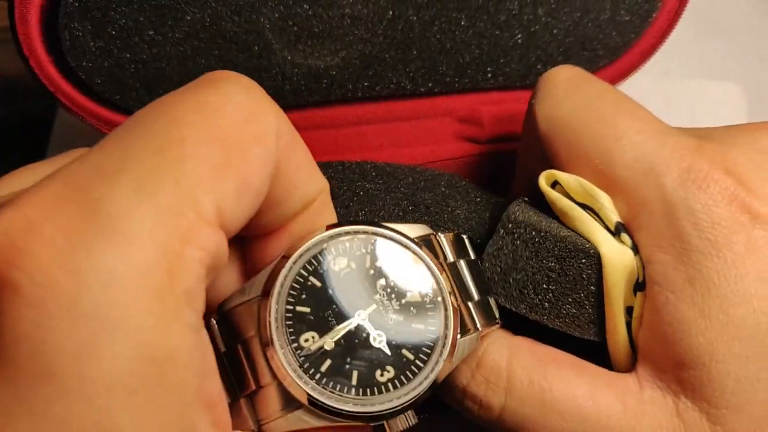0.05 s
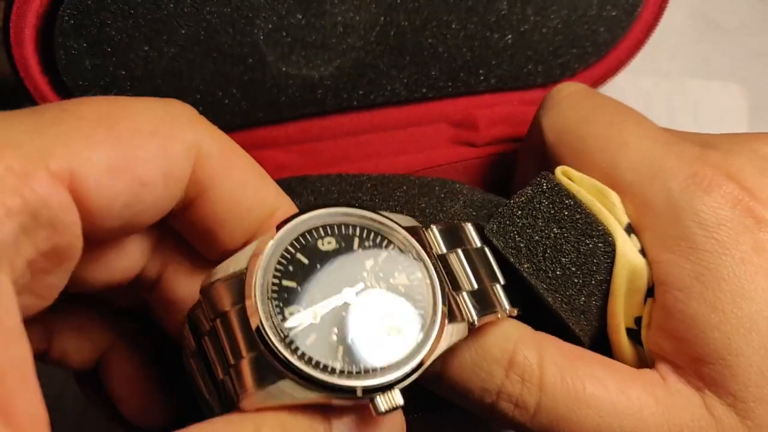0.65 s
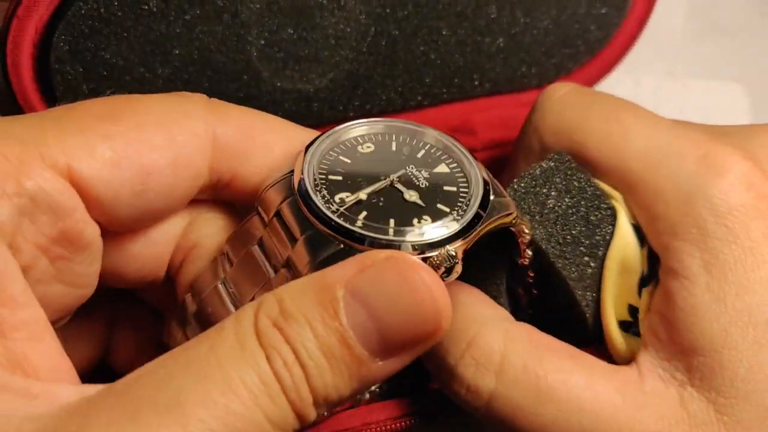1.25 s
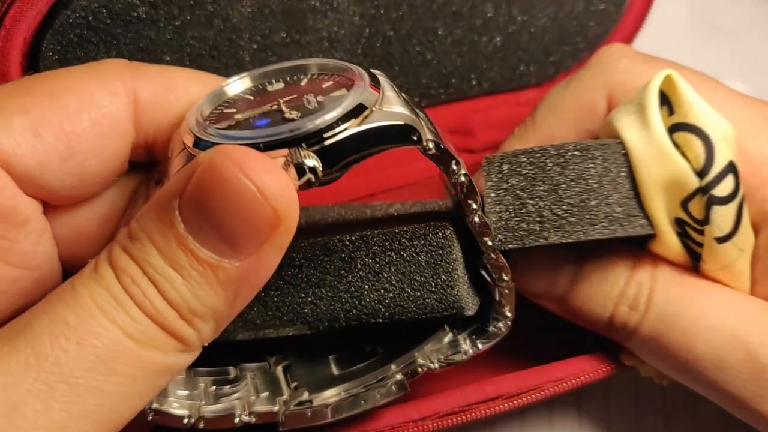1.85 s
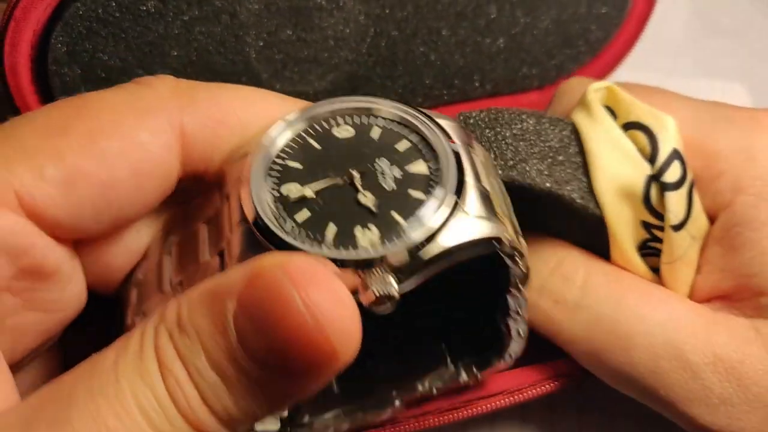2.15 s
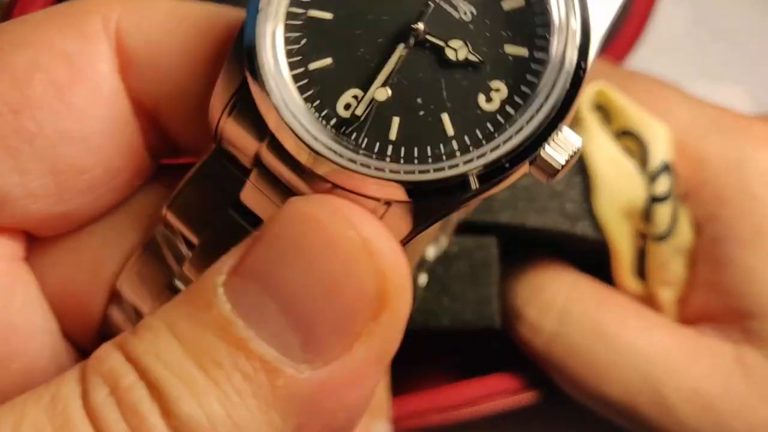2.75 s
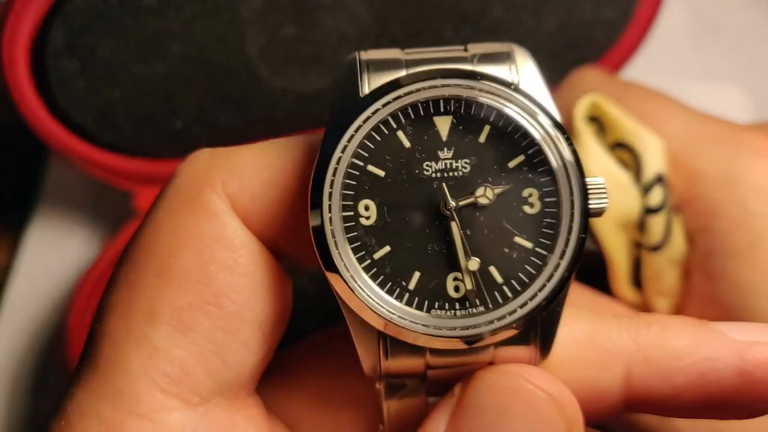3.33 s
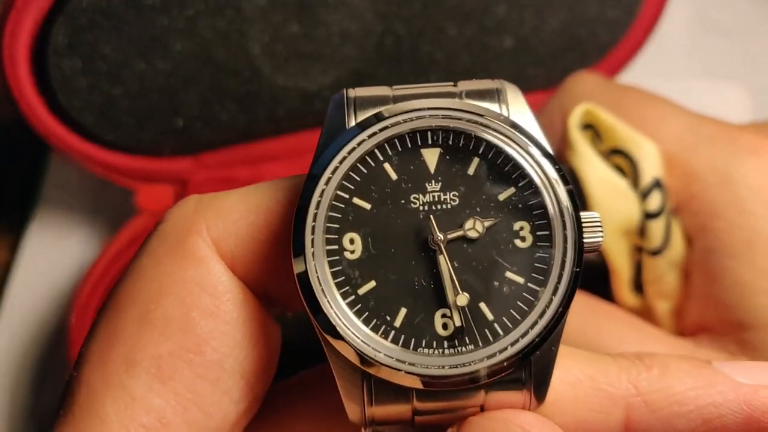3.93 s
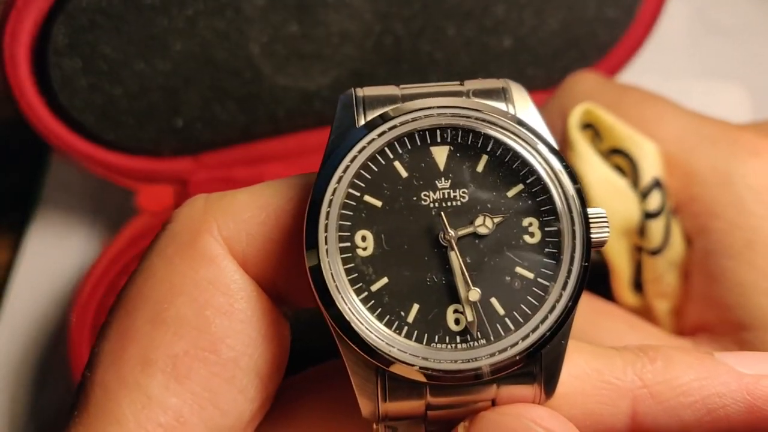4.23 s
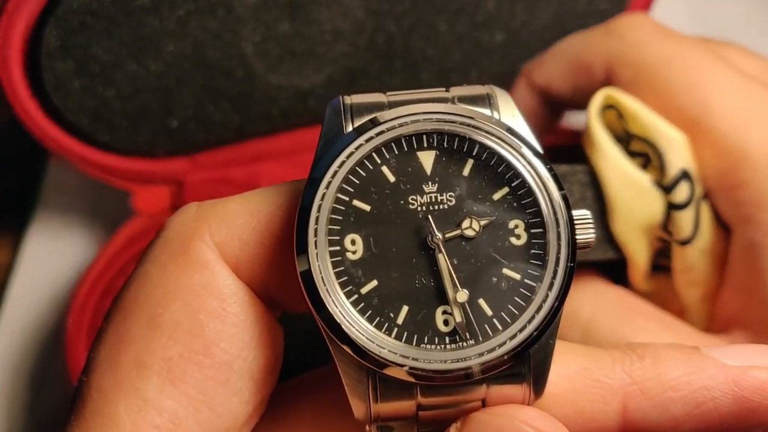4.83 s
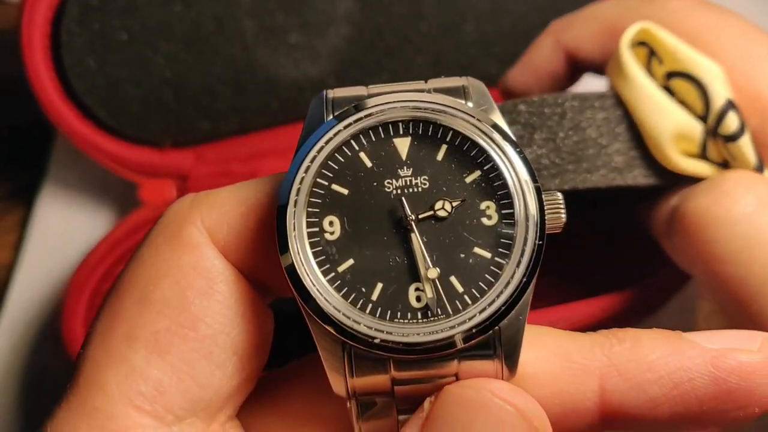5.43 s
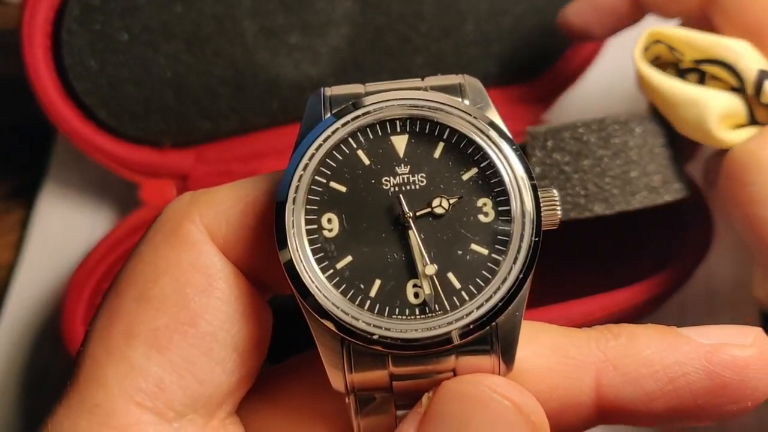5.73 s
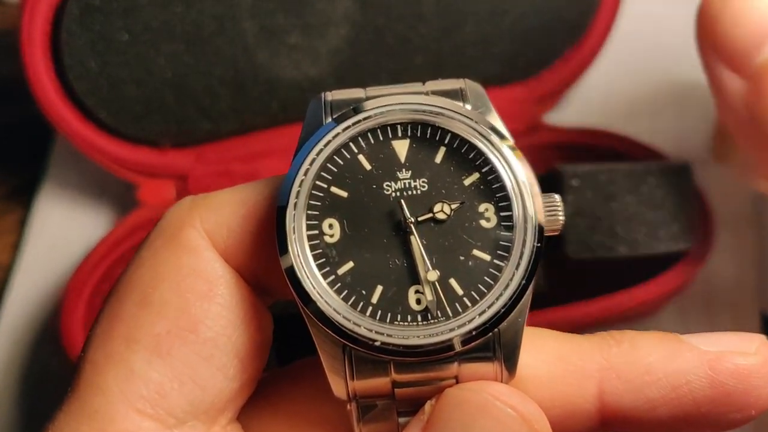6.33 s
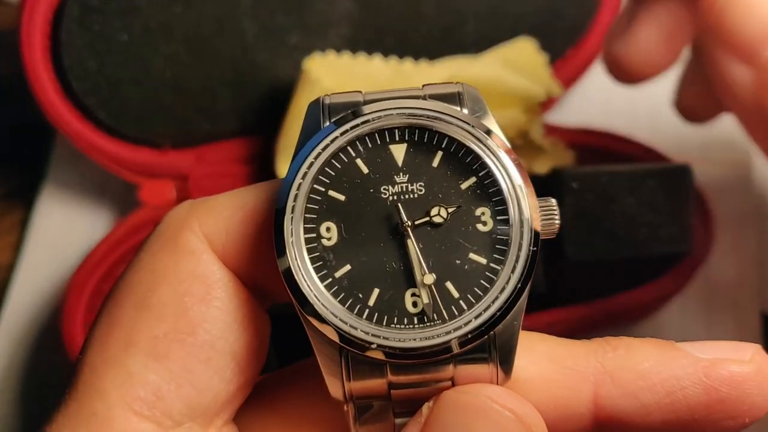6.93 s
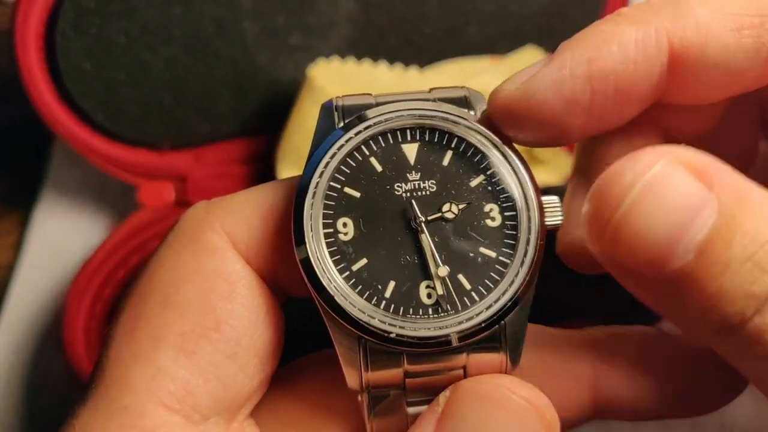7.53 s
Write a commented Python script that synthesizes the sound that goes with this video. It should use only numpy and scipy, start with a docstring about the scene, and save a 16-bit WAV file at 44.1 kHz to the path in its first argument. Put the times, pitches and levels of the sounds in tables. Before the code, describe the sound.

Small steel clicks of a watch bracelet handled close by, with soft finger rubbing over a low fan drone.

```python
"""Small steel clicks and ticks, close by: a watch bracelet is turned in the fingers and eased off a foam
cushion. Each impact excites modes of the steel, which the hand damps within milliseconds. Stick-slip
friction makes the rub of skin and foam and the short zip of sliding links. Behind them, in a small
room, a fan motor drones and beats slowly against the mains hum."""
import sys
import numpy as np
from scipy import signal
from scipy.fft import rfft, irfft, next_fast_len
from scipy.io import wavfile
from scipy.ndimage import map_coordinates

SR = 44100
rng = np.random.default_rng(int(sys.argv[2]) if len(sys.argv) > 2 else 0)


def wrap_up_sound(samples):
    """Save the sound to the file named by the first command line argument, as 16-bit audio."""
    columns = np.atleast_2d(samples).T
    # keep every value between -1 and 1, then stretch to whole-number steps
    tamed = np.clip(columns, -1, 1)
    steps = np.round(tamed * 32767).astype(np.int16)
    wavfile.write(sys.argv[1], SR, steps)


N = 338688

# modes of the hand-held bracelet and case: pitch_hz, relative_db, t60_s
STEEL_MODES = [(935, 2.5, 0.025), (1116, 6, 0.018), (1390, 2, 0.0072), (1900, -11, 0.0051),
               (2140, -1, 0.0091), (2400, -7, 0.0094), (2620, 4, 0.016), (3100, 4, 0.014),
               (3600, -13, 0.0093), (4030, 2, 0.014), (4170, 2.5, 0.0068), (4930, 8, 0.0069),
               (5720, 9.5, 0.0059), (6200, -5, 0.0073), (6400, 10, 0.0043), (7300, -5, 0.017),
               (9800, 0, 0.0065), (12800, -2, .004), (15200, 1, .005)]
# link impacts: start_s, case_knock_db, link_clack_db, ping_db, edge_tick_db,
# note_hz, note_db (the link's own note), hinge_snap_db, lean_left_db
CONTACTS = [(0.3273, -54, -59, -60, -71, 2600, -62, -66, -2),
            (0.332, -45, -57, -57.5, -66, 2590, -52, -59, 2.5),
            (0.3348, -50, -63, -63, -74, 3100, -52.5, -62, 1),
            (0.3427, -61, -64, -62, -75, 3100, -65, -68, 0), (0.372, -49, -64, -70, -80, 2600, -64, -66, 0),
            (0.377, -56, -61, -66, -80, 2100, -58, -65, -1),
            (0.797, -47, -59, -64, -80, 4100, -71, -67, -1),
            (0.804, -45.5, -65, -68, -80, 1400, -60, -62, 4),
            (0.853, -60, -63, -70, -80, 2300, -65, -65, 0), (0.922, -54, -60, -65, -80, 3230, -59, -58, -1),
            (0.955, -49, -60, -72, -80, 2100, -67, -65, 0), (1.033, -51, -63, -72, -80, 1900, -65, -66, 0),
            (1.128, -60, -65, -72, -80, 2800, -67, -67, 0), (1.1583, -47, -59, -63, -80, 1760, -51, -63, 3),
            (1.1604, -49, -60, -62, -80, 3460, -55, -60, 0),
            (1.2608, -54, -62, -73, -80, 2680, -64, -68, 3),
            (1.3315, -61, -70, -63, -62, 5900, -60, -72, 0),
            (1.3374, -43, -51, -50.5, -76, 2890, -46.5, -47, 2),
            (1.7486, -61, -58, -73, -80, 2560, -59, -62, .5),
            (1.7502, -62, -65, -73, -80, 2520, -59, -59, .5),
            (1.7803, -51, -54, -60, -74, 3020, -55, -58, 2),
            (1.7828, -54, -59, -62, -76, 4250, -59, -57, .5),
            (2.0345, -58, -67, -65, -79, 4450, -64, -70, -2),
            (2.187, -60, -66, -70, -80, 1620, -54, -64, -1.3),
            (2.189, -60, -68, -72, -80, 2700, -60, -68, 0), (2.318, -65, -70, -68, -75, 5800, -65, -72, 0),
            (2.47, -56, -65, -64, -69, 4500, -66, -70, -2), (2.539, -50, -64, -63, -70, 4100, -64, -61, 0),
            (2.772, -60, -66, -63, -74, 4200, -71, -64, 0),
            (2.821, -53, -67, -56.5, -68, 3400, -59, -72, 4),
            (5.027, -56, -63, -70, -80, 2600, -62, -64, 3), (5.0292, -49, -61, -68, -80, 2580, -51, -53, 2),
            (5.031, -47.5, -58, -67, -80, 4090, -54, -58, 0),
            (5.0793, -60, -64, -58, -74, 6860, -65, -66, -1),
            (5.914, -60, -65, -70, -77, 4200, -67, -70, 0)]
def link_clicks(note_t60_s=0.012, scuff_share=0.04, scuff_t60_s=0.02, rise_s=0.00013):
    """Modal ringing: a blow and a brief scuff excite damped modes of the steel and the link's own note."""
    t = np.arange(SR // 20) / SR
    steel_hz, steel_db, steel_t60 = np.transpose(STEEL_MODES)
    mode_db, t60 = np.append(steel_db, 0), np.append(steel_t60, note_t60_s)
    # edges in Hz part knock, clack, ping and tick; the note is a fifth group
    groups = np.append(np.searchsorted([1500, 4800, 8200], steel_hz), 4)
    out = np.zeros((2, N + SR))
    for start_s, *band_db, note_hz, note_db, snap_db, left_db in CONTACTS:
        # every link differs a little, and each channel hears the modes in another phase
        pitch_hz = np.append(steel_hz * (1 + 0.01 * rng.standard_normal(len(steel_hz))), note_hz)
        phase = rng.standard_normal((2, len(pitch_hz), 1))
        strength_db = mode_db + 1.8 * rng.standard_normal(len(pitch_hz))
        envelope = amp(strength_db[:, None] - 60 * t / t60[:, None]) * (1 - np.exp(-t / rise_s))
        modes = envelope * np.sin(2 * np.pi * pitch_hz[:, None] * t + phase)
        force = scuff_share * rng.standard_normal((2, len(t))) * amp(-60 * t / scuff_t60_s)
        force[:, 0] += 1  # the blow
        click = amp(snap_db) * hinge_snap(t)
        for group, level_db in enumerate([*band_db, note_db]):
            ring = signal.fftconvolve(modes[:, groups == group].sum(axis=1), force, axes=1)
            click += amp(level_db) * unit_burst(ring[:, :len(t)])
        out[:, round(start_s * SR):][:, :len(t)] += lean(left_db) * click
    return out[:, :N]


# broad resonances of a hinge: centre_hz, width_hz, relative_db
HINGE_MODES = [(2300, 470, 5), (2970, 450, 2), (4200, 600, -11.5)]
def hinge_snap(t, t60_s=0.007, stereo_spread=0.4):
    """Transient excitation: a hinge takes up its play, and the chatter drives its broad resonances."""
    chatter = rng.standard_normal(len(t)) + stereo_spread * rng.standard_normal((2, len(t)))
    chatter *= amp(-60 * t / t60_s)
    response = resonances(HINGE_MODES, np.fft.rfftfreq(len(t), 1 / SR)) ** 2
    return unit_burst(irfft(rfft(chatter) * response, len(t)))


# the fingers shift their grip on steel and cushion: start_s, length_s, skin_db, foam_db
GRIPS = [(0.007, 0.23, -61.5, -74), (0.295, 0.14, -57, -67), (0.49, 0.32, -64, -75),
         (0.743, 0.33, -60, -70), (1.083, 0.4, -63.5, -73), (1.44, 0.3, -63, -70),
         (1.707, 0.22, -62, -66.5), (1.972, 0.15, -59.5, -68), (2.14, 0.3, -68, -71),
         (2.48, 0.14, -61, -71), (2.71, 0.14, -65, -65), (3.06, .12, -67, -72), (4.533, 0.15, -58.5, -70),
         (4.985, .21, -62.5, -70), (6.3, 0.44, -69, -77), (6.8, 0.98, -78, -88)]
GRIP_ATTACK_S, GRIP_RELEASE_S = 0.047, 0.075
def hinge_ticks(gain_db=-13, ticks_per_s=60, spread_db=1):
    """Poisson impacts: loose hinges tick at random as the grip shifts, harder under a firmer stroke."""
    sizes = amp(spread_db * np.clip(rng.standard_normal(N), -2, 2)) * rng.standard_normal((2, N))
    ticks = sizes * (rng.random(N) < ticks_per_s / SR)
    grip = strokes(np.array(GRIPS)[:, :3], GRIP_ATTACK_S, GRIP_RELEASE_S)
    return amp(gain_db) * grip * unit(filtered(ticks, lambda f: resonances(HINGE_MODES, f)))


# modes of a sliding link: centre_hz, width_hz, relative_db
SLIDE_MODES = [(4300, 900, -17), (5640, 450, -11), (6050, 350, -12), (6600, 320, -5.5), (6850, 290, -4),
               (7260, 200, -8)]
# links slide over each other: start_s, length_s, level_db, pitch_ratio
SLIDES = [(2.012, 0.052, -69, 0.81), (2.935, 0.062, -54, 0.99)]
def link_slides(grit_db=-15):
    """Stick-slip of steel on steel: quick slips excite a cluster of high modes over a faint, broad grit."""
    ring = lambda f: resonances(SLIDE_MODES, f) * lowpass(f, 7400, 30) * highpass(f, 3900, 6)
    out = np.zeros((2, N))
    for start_s, length_s, level_db, pitch_ratio in SLIDES:
        slips = friction(lambda f: ring(f / pitch_ratio), rate_hz=500, rough_db=3)
        grit = friction(lambda f: resonances([(6000, 6000, 0)], f), rate_hz=530, rough_db=12)
        envelope = strokes([(start_s, length_s, level_db)], attack_s=0.008, release_s=0.022)
        out += envelope * (slips + amp(grit_db) * grit)
    return out


# friction spectra of skin and of foam: frequency_hz, density_db
SKIN_SPECTRUM = [(700, -11), (1400, 4), (2200, -4), (3200, -7.5), (4300, -6), (5200, -26), (9000, -45)]
FOAM_SPECTRUM = [(2000, -45), (4200, 7), (6000, 8.5), (7100, 6), (8200, 0), (15000, -11)]
def finger_rub(skin_hold_db=-72, foam_hold_db=-86):
    """Sliding friction: skin drags over steel and foam crackles finely; even a steady hold creeps."""
    grips = np.array(GRIPS)
    skin_gain = np.hypot(amp(skin_hold_db), strokes(grips[:, :3], GRIP_ATTACK_S, GRIP_RELEASE_S))
    foam_gain = np.hypot(amp(foam_hold_db), strokes(grips[:, [0, 1, 3]], GRIP_ATTACK_S, GRIP_RELEASE_S))
    skin = friction(lambda f: amp(along(SKIN_SPECTRUM, f)), rate_hz=200, rough_db=2)
    foam = friction(lambda f: amp(along(FOAM_SPECTRUM, f)), rate_hz=190, rough_db=2)
    return skin_gain * skin + foam_gain * foam


# the cushion is drawn out of its case: start_s, length_s, relative_db
PULL = [(4.25, 0.97, -52.5)]
# modes of the hollow case: centre_hz, width_hz, relative_db
CAVITY_MODES = [(507, 43, 4), (527, 64, -3), (694, 90, -8)]
def cushion_pull(gain_db=-1):
    """Cavity resonance: foam drags along the lining and sounds the hollow of the case."""
    hollow = lambda f: resonances(CAVITY_MODES, f) * lowpass(f, 900, 4) * highpass(f, 350, 4)
    envelope = amp(gain_db) * strokes(PULL, attack_s=0.13, release_s=0.45)
    return envelope * friction(hollow, rate_hz=89, rough_db=2.5)


# a hand sweeps over the padded case: start_s, length_s, relative_db
SWEEPS = [(0.17, 0.61, -53), (0.75, 0.45, -52), (1.22, 0.15, -53), (1.48, 0.19, -51.5), (2.17, 0.29, -55),
          (2.48, 0.087, -61), (2.72, 0.16, -52), (4.33, 0.56, -56.5), (5.08, 0.23, -54.5),
          (6.05, 0.23, -54), (6.72, 1, -56)]
# friction spectrum of the padding: frequency_hz, density_db
PADDING_SPECTRUM = [(200, -28), (330, -7), (470, 1), (600, -2.5), (780, -4.5), (1150, -3.5), (1400, -7.5),
                    (2000, -21), (5000, -56)]
def hand_brush(gain_db=-1, rest_db=-71.5):
    """Friction on a soft surface: hands brush the padding with a dull rustle, faint while they rest."""
    envelope = amp(gain_db) * np.hypot(amp(rest_db), strokes(SWEEPS, attack_s=0.066, release_s=0.14))
    return envelope * friction(lambda f: amp(along(PADDING_SPECTRUM, f)), rate_hz=70, rough_db=3.5)


# harmonics of the fan's shaft: order, level_db, flutter_db
SHAFT_ORDERS = [(1, -45, 0.43), (2, -51.5, 1.9), (3, -54, 1.3)]
# level of the low drone near 196 Hz, a steady fan tone wavering as air noise mixes with it:
# time_s, level_db
DRONE_LEVEL = [(0.1, -63), (0.15, -45), (0.5, -51), (0.67, -43.5), (0.82, -49), (1.28, -46.5), (1.44, -59),
               (1.48, -44.5), (1.95, -46.5), (2.08, -44.5), (2.79, -49), (2.85, -42), (2.93, -44.5),
               (2.98, -56), (3.03, -45.5), (3.24, -47.5), (3.5, -46), (3.66, -52), (3.85, -47.5),
               (4.25, -44.5), (4.72, -48), (4.8, -59), (4.93, -46.5), (5.07, -47), (5.13, -50),
               (5.22, -44.5), (5.43, -49.5), (5.55, -44.5), (5.95, -48.5), (6.02, -42), (6.15, -51),
               (6.21, -42.5), (6.39, -53), (6.47, -45), (7.1, -48.5), (7.6, -45)]
def fan_motor(shaft_hz=48.88, mains_hz=49.985, hum_db=-55.5, flutter_hz=7, drone_flutter_db=0.5):
    """Beating: the rotor slips behind the mains, so its second order and the hum beat about twice a second."""
    t = np.arange(N) / SR
    shaft_rad = 2 * np.pi * shaft_hz * t
    drone = (4, np.interp(t, *np.transpose(DRONE_LEVEL)), drone_flutter_db)
    tones = np.zeros(N)
    for order, level_db, flutter_db in [*SHAFT_ORDERS, drone]:
        # the room shifts the higher orders, so they never add up to a pulse
        shift_rad = 1.05 * (order - 1) * (order - 2)
        flutter = amp(flutter_db * unit(wobble(flutter_hz)))
        wander_rad = -0.01 * flutter_db * wobble(flutter_hz)
        tones += amp(level_db) * unit(flutter * np.sin(order * shaft_rad + shift_rad + wander_rad))
    hum = amp(hum_db) * unit(-np.sin(2 * np.pi * 2 * mains_hz * t))
    return lean(0.15) * (tones + hum)


# resonances of fan and room: centre_hz, width_hz, relative_db
HOUSING_MODES = [(125.2, 5.6, 3.5), (175, 12, -2), (239.6, 38, 0.5), (290, 3.1, -5.5), (320.6, 11, 2),
                 (377.5, 20, -2), (450, 21, -7), (495.4, 29.4, -3), (607, 4.3, -4.5), (626, 13, -7),
                 (684, 23, -4), (741, 24, -2.5), (787, 5.3, 0), (1090, 40, -25)]
# spectra of moving air and of hiss: frequency_hz, density_db
AIR_SPECTRUM = [(20, -6.5), (60, -10), (110, -6), (180, -2), (270, -5.5), (400, -9.5), (570, -16.5),
                (800, -11.5), (1130, -13), (1270, -19), (2200, -24), (3200, -30.5), (4400, -30),
                (5200, -35)]
HISS_SPECTRUM = [(3500, -45), (4800, -1.5), (5400, 2), (6400, 1.5), (7200, -1), (8100, -7), (11000, -8),
                 (15500, -7)]
def fan_air(housing_db=-50, air_db=-48.5, hiss_db=-68):
    """Broadband flow noise: air rushes, and the resonances of fan and room sound under a faint hiss."""
    power = lambda f: sum(abs(resonances([mode], f)) ** 2 for mode in HOUSING_MODES)
    housing = amp(housing_db) * diffuse(lambda f: np.sqrt(power(f)) * lowpass(f, 1200, 3))
    air = amp(air_db) * diffuse(lambda f: amp(along(AIR_SPECTRUM, f)) * lowpass(f, 5600, 6))
    hiss = amp(hiss_db) * diffuse(lambda f: amp(along(HISS_SPECTRUM, f)))
    return lean(0.4) * (housing + air) + hiss


# likeness of left and right: frequency_hz, coherence
COHERENCE = [(100, 0.76), (200, 0.89), (300, 0.9), (500, 0.48), (900, 0.24), (2000, 0), (6000, 0)]
def diffuse(response):
    """Diffuse field: noise of rms 1, coherent in the bass and unrelated in the treble."""
    angle = lambda f: np.arccos(along(COHERENCE, f)) / 2
    split = lambda f: response(f) * np.array([np.cos(angle(f)), np.sin(angle(f))])
    mid, side = filtered(rng.standard_normal((2, N)), split)
    return unit(np.array([mid + side, mid - side]))


# reverberation times of the small room: frequency_hz, t60_s
ROOM_DECAY = [(300, 0.12), (2000, 0.16), (10000, 0.057)]
def room(x):
    """Reverberation: a short diffuse tail decays exponentially, different in each channel."""
    hz, t, noise = signal.stft(rng.standard_normal((2, SR // 3)), SR, nperseg=256)
    tail = signal.istft(noise * amp(-60 * t / along(ROOM_DECAY, hz)[:, None]), SR, nperseg=256)[1]
    delayed = np.pad(tail, ((0, 0), (SR // 300, 0))) / np.linalg.norm(tail[0])
    return signal.fftconvolve(x, delayed, axes=1)[:, :N]


def friction(response, rate_hz, rough_db):
    """Stick-slip noise of rms 1: clumps of tiny slips pass through a body's response."""
    return unit(filtered(rng.standard_normal((2, N)) * amp(rough_db * wobble(rate_hz)), response))


def strokes(rows, attack_s, release_s):
    """Trapezoidal envelopes: each stroke rises, holds and lets go."""
    t = np.arange(N) / SR
    return sum(amp(db) * np.clip(np.minimum((t - start) / attack_s, (start + length - t) / release_s), 0, 1)
               for start, length, db in rows)


def resonances(modes, f):
    """Superposition: the summed response of damped resonators."""
    return sum(amp(db) * 1j * f * width / (hz * hz - f * f + 1j * f * width) for hz, width, db in modes)


def lowpass(f, corner_hz, order):
    """Maximally flat roll-off above the corner."""
    return 1 / np.sqrt(1 + (f / corner_hz) ** (2 * order))


def highpass(f, corner_hz, order):
    """Maximally flat roll-off below the corner."""
    return lowpass(corner_hz, f + 1, order)


def filtered(x, response):
    """Linear filtering: the spectrum of x times a frequency response."""
    size = next_fast_len(N + SR // 2)
    return irfft(rfft(x, size) * response(np.fft.rfftfreq(size, 1 / SR)), size)[..., :N]


def wobble(rate_hz):
    """Random modulation: a smooth curve through rate_hz knots a second."""
    knots = rng.standard_normal(int(N * rate_hz / SR) + 4)
    return map_coordinates(knots, [np.arange(N) * rate_hz / SR])


def along(points, hz):
    """Interpolation on a log frequency axis."""
    point_hz, values = np.transpose(points)
    return np.interp(np.log(hz + 1), np.log(point_hz + 1), values)


def lean(left_db):
    """Level panning: left up and right down by left_db."""
    return amp([[left_db], [-left_db]])


def amp(db):
    """Decibels to gain."""
    return 10 ** (np.asarray(db) / 20)


def unit(x):
    """Scale to rms 1."""
    return x / np.sqrt(np.mean(x ** 2) + 1e-20)


def unit_burst(x):
    """Scale to the energy of five milliseconds of stereo at rms 1."""
    return x * np.sqrt(2 * (SR // 200) / np.sum(x ** 2))


def scene(room_db=-15):
    """Superposition: the steel and its reverberation, the handling, and the fan further off."""
    steel = link_clicks() + hinge_ticks() + link_slides()
    reverberation = amp(room_db) * room(steel)
    handling = hand_brush() + finger_rub() + cushion_pull()
    return steel + reverberation + handling + fan_motor() + fan_air()


# treble dip of the microphone's right port: centre_hz, width_hz, depth_fraction
PORT_NOTCH = (5250, 530, 0.67)
def record(dry, top_hz=15750):
    """Microphone response: a notch in the right channel and a band limit on both."""
    hz, width_hz, depth = PORT_NOTCH
    right = filtered(dry[1], lambda f: 1 - depth / (1 + (2 * (f - hz) / width_hz) ** 2))
    return filtered(np.array([dry[0], right]), lambda f: f < top_hz)


dry = scene()
out = record(dry)
wrap_up_sound(out)
```